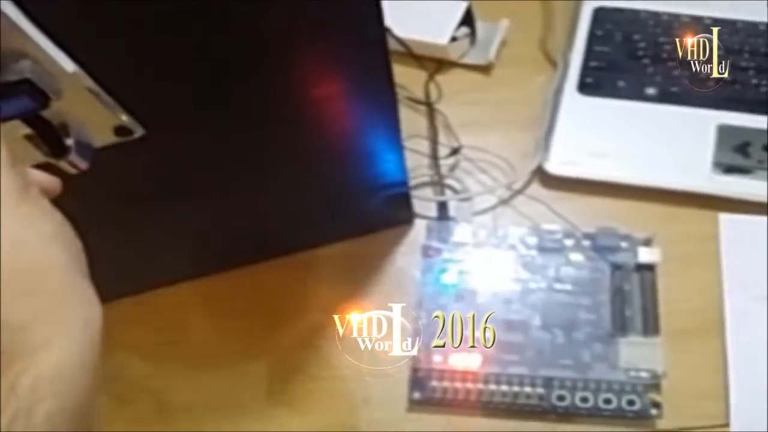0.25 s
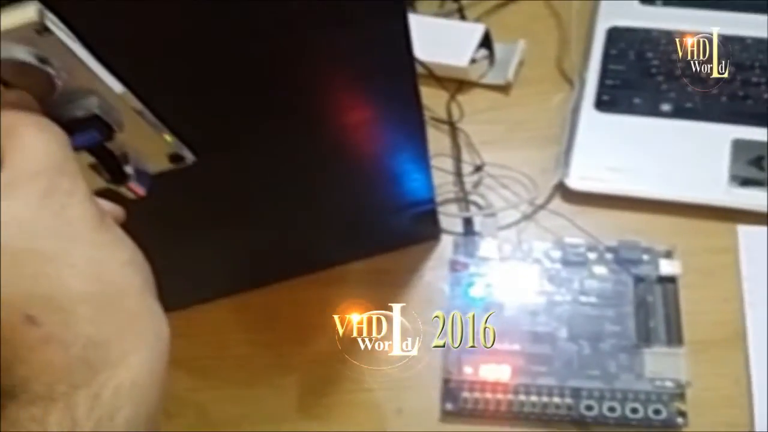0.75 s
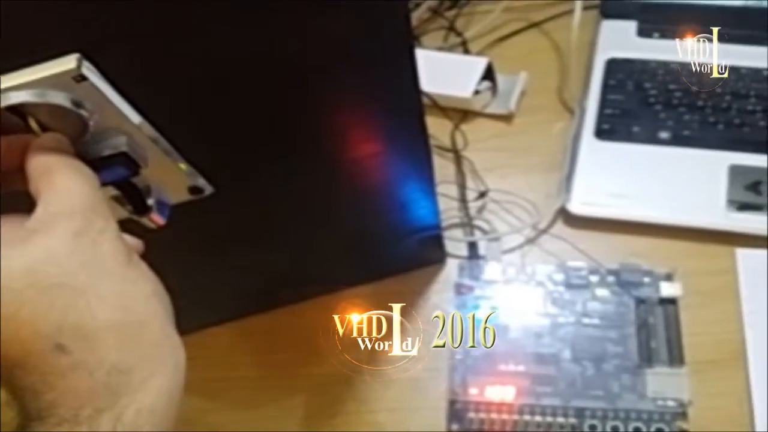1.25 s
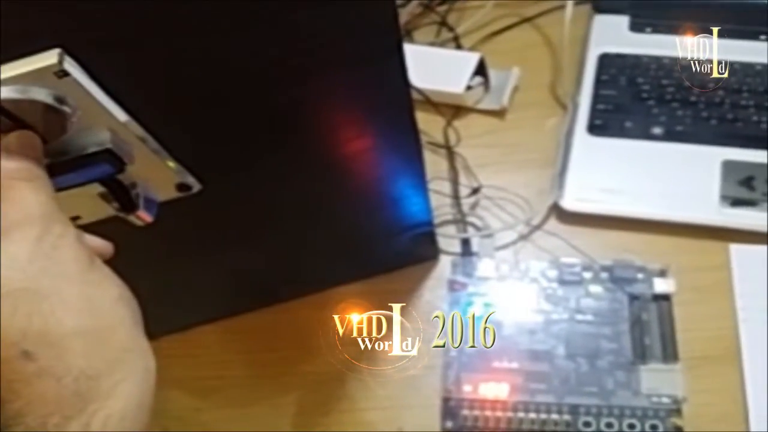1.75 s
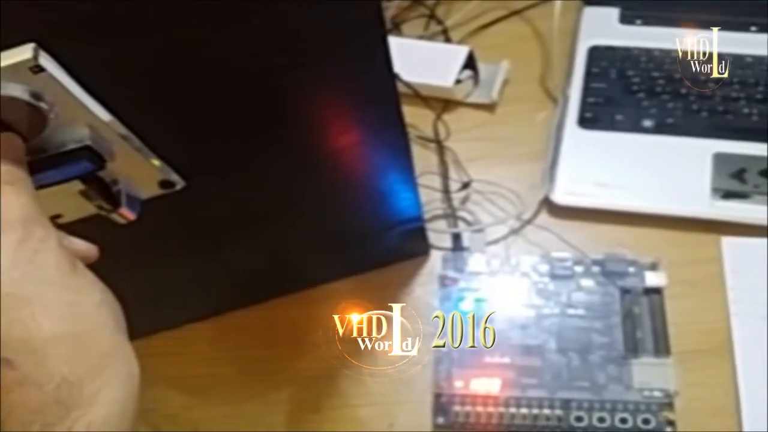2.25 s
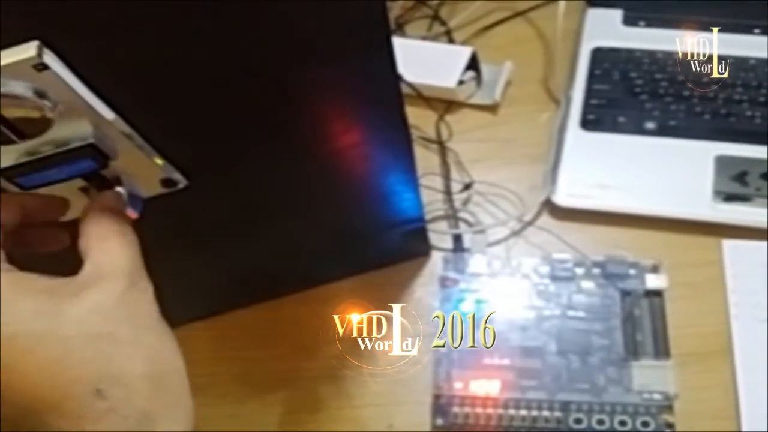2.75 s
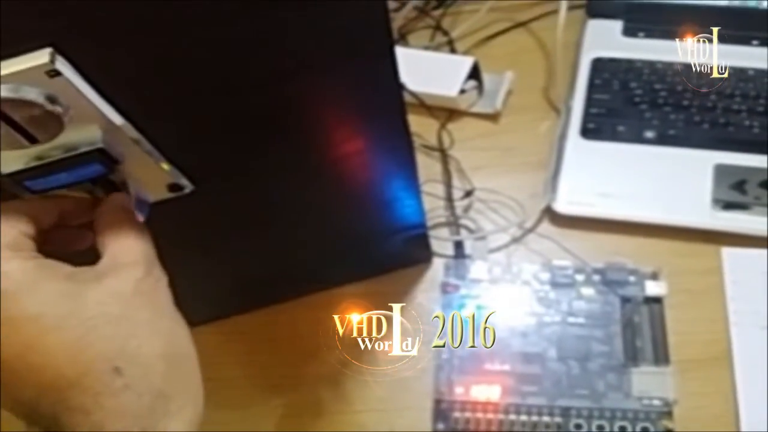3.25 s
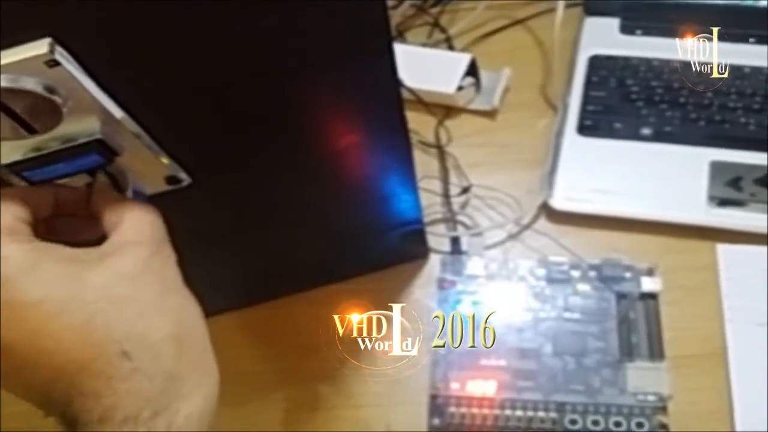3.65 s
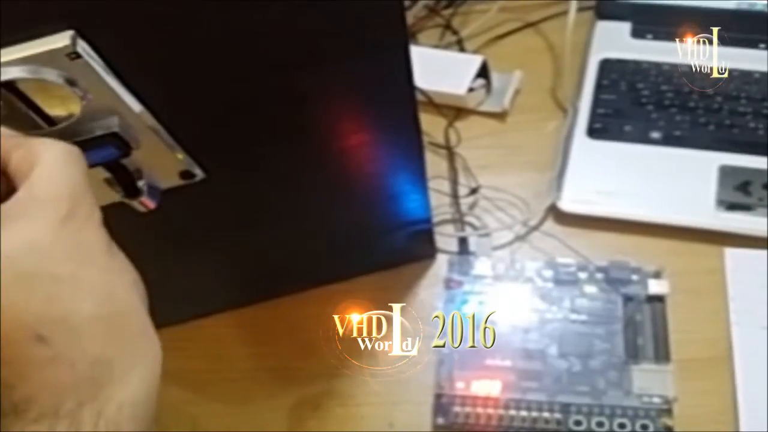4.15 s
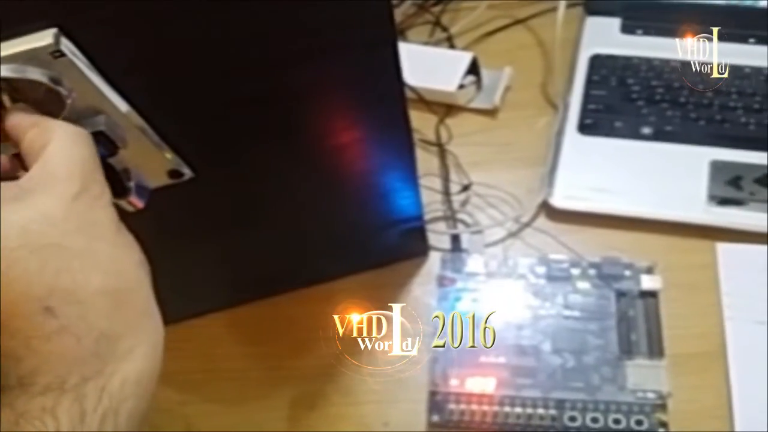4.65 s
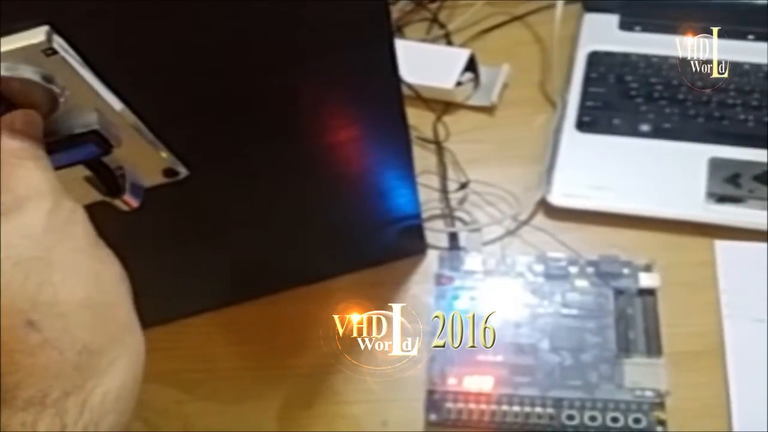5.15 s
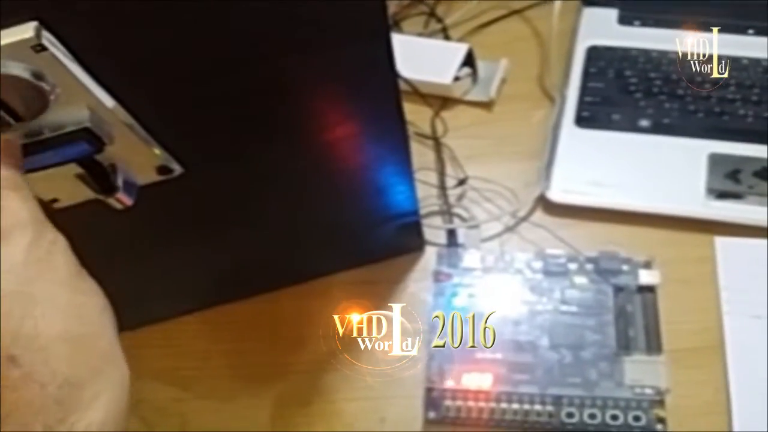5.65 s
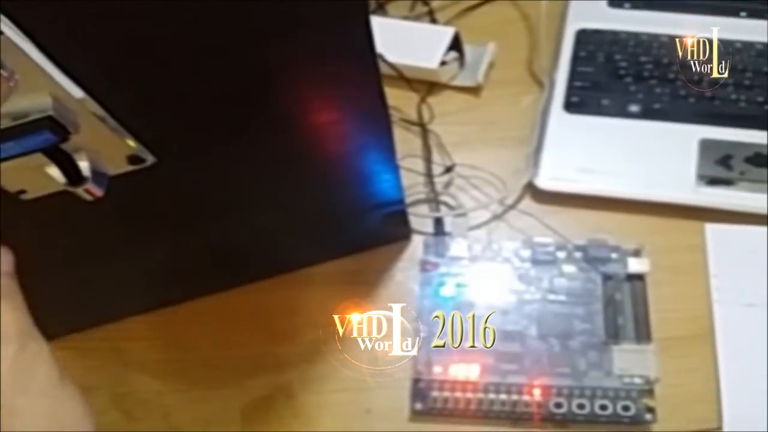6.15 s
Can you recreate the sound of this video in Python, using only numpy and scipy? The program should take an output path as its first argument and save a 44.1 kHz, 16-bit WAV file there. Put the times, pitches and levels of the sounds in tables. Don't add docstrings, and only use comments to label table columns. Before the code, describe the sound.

Close stereo pickup, nearer on the right, of a coin knocking on a face plate, sliding in a slot and rattling inside a hollow case on a desk. Two bursts of clacks are separated by quieter ticks and soft scraping; the second burst is louder and denser. Behind are low traffic rumble, soft hiss, a very faint fan whine and an engine that swells and fades early.

```python
import sys
import numpy as np
from scipy import signal
from scipy.fft import rfft, irfft, next_fast_len
from scipy.io import wavfile
from scipy.ndimage import uniform_filter1d

SR = 44100
rng = np.random.default_rng(int(sys.argv[2]) if len(sys.argv) > 2 else 0)


def dump_mix(stems):
    frames = np.atleast_2d(stems).T
    limited = np.clip(frames, -1, 1)
    pcm = np.round(limited * 32767).astype(np.int16)
    wavfile.write(sys.argv[1], SR, pcm)


def linear_from_db(decibels):
    return 10 ** (np.asarray(decibels, float) / 20)


N = 282194
M = next_fast_len(N)
PLACES = 3
LEFT_LAG_S = .00019


def level(x, db):
    return x * linear_from_db(db) / np.sqrt(np.mean(x ** 2))


def peak(x):
    return x / np.abs(x).max(axis=-1, keepdims=True)


def along(points, hz):
    point_hz, value = np.array(points).T
    return np.interp(np.log(hz + 1), np.log(point_hz + 1), value)


def band(x, low_hz, high_hz):
    edges = [low_hz, min(high_hz, .45 * SR)]
    return signal.sosfilt(signal.butter(2, edges, "band", fs=SR, output="sos"), x)


def walk(rate):
    k = int(SR / rate)
    held = np.repeat(rng.standard_normal(N // k + 1), k)
    return 0.7 * uniform_filter1d(uniform_filter1d(held, k), k)[:N]


def air():
    # frequency in Hz, likeness from 0 to 1.
    likeness = [(60, 1), (130, 0.78), (290, 0.93), (640, 0.34), (1410, 0.32), (3100, 0.25), (6820, 0),
                (15000, 0)]
    # frequency in Hz, density in dB per Hz.
    bass_colour = [(22, -35), (30, -12), (37, 4), (46, -14.5), (62, -8), (85, -10), (114, -9), (160, -14.5),
                   (205, -20), (283, -8), (345, -14), (420, -14), (560, -15.5)]
    hiss_colour = [(250, -15), (420, -3.5), (520, -14.5), (663, -7.5), (705, -9.5), (761, -3), (986, -10.5),
                   (1130, -3.5), (1300, -12), (1650, -4), (2650, -12.5), (4450, -14), (7940, -23.5),
                   (14800, -26), (16000, -32)]
    # time in seconds, level in dB.
    rumble = [(0.0, -53.5), (0.39, -57), (0.94, -51), (1.96, -48.5), (2.64, -49), (2.87, -55), (4.15, -59),
              (4.63, -53.5), (5.11, -54.5), (5.74, -51.5), (5.97, -53.5), (6.4, -59)]
    hz, t = np.fft.rfftfreq(M, 1 / SR), np.arange(N) / SR
    alike = along(likeness, hz)
    mid = rfft(rng.standard_normal(M)) * np.sqrt(1 + alike)
    side = rfft(rng.standard_normal(M)) * np.sqrt(1 - alike)
    both = np.array([mid + side, mid - side])
    low = 1 / (1 + (hz / 480) ** 4)
    rumble_db = np.interp(t, *np.transpose(rumble))
    bass = level(irfft(both * low * linear_from_db(along(bass_colour, hz)), M)[:, :N], -3.7)
    bass = bass * linear_from_db(rumble_db + 0.47 * walk(15))
    hiss = level(irfft(both * (1 - low) * linear_from_db(along(hiss_colour, hz)), M)[:, :N], 0)
    hiss = hiss * linear_from_db(-34.5 + 0.52 * rumble_db + 0.18 * walk(0.96))
    fan_hz = 1158 + 5.34 * walk(4.4)
    fan = linear_from_db(-70 + 3.8 * walk(5.1)) * np.sin(2 * np.pi * np.cumsum(fan_hz) / SR)
    return bass + hiss + fan


def engine():
    # time in seconds, firing rate in Hz, load in dB.
    run = [
        (0.0, 30.47, -88),
        (0.379, 31.62, -68.5),
        (0.86, 32.82, -58.5),
        (1.3, 33.88, -57),
        (1.71, 34.65, -55),
        (1.91, 36.62, -54),
        (2.5, 37.1, -53.5),
        (2.85, 37.46, -59),
        (3.3, 38.5, -94),
    ]
    # multiple of the firing rate, level in dB.
    orders = [(1, -9), (3, 1.5), (4, -11), (5, -15), (7, -11), (8, -5), (9, 5.5)]
    pane_hz, pane_width_hz, pane_leak_db = 295.8, 6.2, -37.5
    s, hz, load_db = np.transpose(run)
    t = np.arange(N) / SR
    rate = np.interp(t, s, hz)
    turn = 2 * np.pi * np.cumsum(rate * (1 + 0.0046 * walk(8.0))) / SR
    fade = np.clip((s[-1] - t) / 0.09, 0, 1)
    load = 2 ** .5 * fade * linear_from_db(np.interp(t, s, load_db))
    order, order_db = np.transpose(orders)[:, :, None]
    resonance = 1 / (1 + ((order * rate - pane_hz) / pane_width_hz) ** 2)
    pane = np.where(order > 7.5, linear_from_db(pane_leak_db) + resonance, 1)
    waver_db = 0.58 * np.array([walk(20) for _ in order])
    return load * np.sum(linear_from_db(order_db + waver_db) * pane * np.sin(order * turn), axis=0)


def room(x):
    # frequency in Hz, time to fall 60 dB in seconds.
    decay = [(150, 0.25), (700, 0.34), (2500, 0.26), (6000, 0.22), (14000, 0.2)]
    room_db, early_db, early_s, patchy_db = -2.5, 2, 0.0079, 3.5
    t, tail = np.arange(SR // 2) / SR, 0
    for hz in 90 * 2. ** np.arange(8):
        noise = rng.standard_normal((2, PLACES, 1, len(t)))
        mid, side = band(noise, hz / 2 ** .5, hz * 2 ** .5)
        spread = np.minimum(hz / 800.0 + t / 0.11, min(hz / 2100.0, 1))
        both = mid + spread * side * np.array([[1], [-1]])
        clumps = linear_from_db(patchy_db * walk(150)[:PLACES * len(t)].reshape(PLACES, 1, -1))
        tail = tail + clumps * both * 1000 ** (-t / along(decay, hz))
    tail = tail * np.clip(t / 0.00026, 0, 1) * (1 + linear_from_db(early_db) * np.exp(-t / early_s))
    tail[:, 0] = np.roll(tail[:, 0], round(LEFT_LAG_S * SR), axis=-1)
    tail = tail * linear_from_db(room_db) / np.sqrt(np.sum(tail ** 2) / 2 / PLACES)
    heard = np.sum(rfft(x, M + SR)[:, None] * rfft(tail, M + SR), axis=0)
    return irfft(heard, M + SR)[:, :N]


def ring(modes, broad_db, low_hz, high_hz, count):
    t = np.arange(SR // 5) / SR
    detune = .006 * rng.standard_normal((len(modes), count, 1))
    uneven_db = 4.5 * rng.standard_normal((len(modes), count, 1))
    y = 0
    for (hz, db, t60), d, u in zip(modes, detune, uneven_db):
        y = y + linear_from_db(db + u) * np.sin(2 * np.pi * hz * (1 + d) * t) * 1000 ** (-t / t60)
    click = band(band(1. * (t == 0), low_hz, high_hz), low_hz, high_hz)
    return peak(peak(y) + linear_from_db(broad_db) * peak(click))


def case(count, sharp_db):
    # frequency in Hz, level in dB, time to fall 60 dB in seconds.
    desk = [(120.8, -1.5, 0.29), (160.7, -2, 0.42), (283, -21, 0.21), (284.6, 10, 0.12),
            (450, -23.5, 0.0057)]
    shell = [(736, -11, 0.072), (818, 13.5, 0.019), (1023, 4, 0.034), (1298, 1, 0.057), (1406, 0, 0.1)]
    face_plate = [(2000, -1, .03), (2230, 1, .035), (2580, 1, .03), (3080, 5, .03), (3380, -1, .03),
                  (3720, -4, .04), (4150, -8, .02), (4800, -12, .015)]
    rim = [(4650, 3, .016), (5200, 5, .016), (5750, 1, .012), (6760, -10, .006), (8060, -6, .0067),
           (12100, -6, .0036)]
    return [ring(desk, sharp_db - 13, 130, 520, count),
            ring(shell, sharp_db - 9, 440, 1900, count),
            ring(face_plate, sharp_db, 1500, 4200, count),
            ring(rim, sharp_db + 1, 4100, 13500, count)]


def sliding():
    # start in seconds, hold in seconds, clack in dB, heft into the case in dB, bite of the rim in dB.
    slides = [(1.654, 0.19, -50.5, 8.5, -16), (1.91, 0.04, -57, 13, 9), (2.043, 0.016, -33.5, 0, -22),
              (2.103, 0.085, -45, 5.5, -26), (2.258, 0.055, -62.5, 23.5, 5), (3.74, 0.019, -50, -2, -46),
              (3.801, 0.0046, -39, 0, -42), (4.464, 0.12, -50.5, -7.5, -13), (4.71, 0.2, -58, 2.5, -8),
              (5.125, 0.18, -50, 7, -13), (5.351, 0.093, -35.5, -3, -12.5), (5.417, 0.024, -56, 11, -4),
              (5.59, 0.012, -29, -13, -34.5), (5.746, 0.029, -39.5, 4.5, -3.5),
              (5.792, 0.06, -30, -1, -12.5), (5.902, 0.2, -53.5, 7.5, -3)]
    grains_per_s, spread_db = 3000, 2.2
    catch_db_s, let_go_db_s = 406, 450
    t, out = np.arange(N) / SR, 0
    grip = linear_from_db(0.32 * walk(41))
    s, hold, db, heft_db, bite_db = np.transpose(slides)[:, :, None]
    building, dying = np.maximum(s - t, 0), np.maximum(t - s - hold, 0)
    strokes = linear_from_db(db - catch_db_s * building - let_go_db_s * dying)
    part_db = (heft_db + 0.5, heft_db, 0 * db, bite_db)
    for body, rel_db in zip(case(PLACES, sharp_db=-3), part_db):
        clicks = rng.random((PLACES, N)) < grains_per_s / SR
        clicks = clicks * linear_from_db(spread_db * rng.exponential(size=(PLACES, N)))
        clicks = clicks * np.sign(rng.random((PLACES, N)) - .5)
        force = linear_from_db(rel_db)[:, 0] @ strokes
        rub = signal.fftconvolve(clicks, body, axes=1)[:, :N]
        out = out + force * grip * level(rub, -12.5)
    return out


def singing():
    # start in seconds, time shaken in seconds,
    # pitch in Hz, level in dB.
    sung_modes = [(1.588, 0.01, 2300, -44), (1.632, 0.018, 779, -29), (1.633, 0.029, 1360, -33.5),
                  (1.66, 0.19, 753, -48), (1.683, 0.045, 2240, -43), (1.77, 0.032, 2170, -36),
                  (1.879, 0.016, 315, -21.5), (1.88, 0.017, 786, -30.5), (1.962, 0.032, 1360, -34),
                  (1.941, 0.071, 162, -39.5), (2.018, 0.029, 3350, -39), (2.105, 0.061, 820, -30.5),
                  (2.095, 0.081, 2150, -27.5), (2.232, 0.0053, 3080, -43), (2.233, 0.0033, 3480, -12),
                  (2.335, 0.0061, 995, -34.5), (2.62, 0.011, 813, -45.5), (5.416, 0.0095, 4600, -45),
                  (3.755, 0.033, 2550, -41), (3.784, 0.039, 3110, -37.5), (3.801, 0.014, 2170, -29.5),
                  (4.233, 0.0057, 850, -41), (4.47, 0.13, 1406, -52), (4.738, 0.015, 1430, -47.5),
                  (4.735, 0.014, 2260, -44), (5.1, 0.045, 815, -37), (5.105, 0.03, 1370, -41),
                  (5.11, 0.02, 2220, -35), (5.2, 0.066, 760, -49), (5.2, 0.11, 2170, -44.5),
                  (5.373, 0.0061, 3400, -35.5), (5.374, 0.0074, 1052, -28.5), (5.414, 0.015, 2690, -22.5),
                  (5.44, 0.011, 813, -38), (5.529, 0.011, 772, -16.5), (5.539, 0.023, 1326, -16.5),
                  (5.545, 0.013, 1425, -19), (5.531, 0.015, 4170, -20.5), (5.56, 0.06, 2410, -27.5),
                  (5.582, 0.0073, 1700, -15), (5.589, 0.0312, 1326, -22), (5.62, 0.028, 1480, -46),
                  (5.73, 0.04, 553, -25.5), (5.738, .006, 3680, -17), (5.81, 0.018, 3620, -27),
                  (5.251, 0.039, 302, -40), (5.849, 0.081, 151, -39), (6.034, 0.016, 774, -32.5),
                  (5.529, 0.15, 116, -33.5), (4.233, 0.0086, 4750, -34),
                  (1.877, 0.01, 5800, -32), (1.878, 0.016, 4500, -32.5), (1.934, 0.0053, 5900, -46),
                  (1.936, 0.018, 4330, -40), (2.24, 0.043, 4800, -39), (2.245, 0.052, 2100, -49),
                  (5.375, .012, 5600, -36), (5.429, .012, 3330, -37), (5.728, 0.027, 5100, -30.5),
                  (5.745, 0.014, 3730, -31), (5.782, 0.056, 5200, -41), (5.79, 0.024, 3940, -26.5),
                  (5.826, 0.04, 3740, -42), (4.78, 0.048, 2260, -51.5), (5.0, 0.074, 700, -53),
                  (5.918, 0.052, 765, -44)]
    t60_s, shortens = .034, 0.86
    out, t = np.zeros(N + SR), np.arange(SR // 2) / SR
    for s, hold, hz, db in sung_modes:
        onset = np.clip(t / .012, 0, 1) if hold > .04 else 1 + 2 * np.exp(-t / .002)
        jolts = rng.standard_normal(len(t)) ** 3 * np.clip((hold - t) / .002, 0, 1) * onset
        mode = np.sin(2 * np.pi * hz * t) * 1000 ** (-t / (t60_s * (hz / 1000) ** -shortens))
        y = signal.fftconvolve(jolts, mode)[:len(t)]
        shaken = y[:int((hold + .005) * SR)]
        start = int(s * SR)
        out[start:start + len(t)] += linear_from_db(db) * y / np.sqrt(np.mean(shaken ** 2))
    return out[:N]


def blows():
    # time in seconds, peak of the clack in dB, heft into the case in dB,
    # bite of the rim in dB, pitch of the clack in Hz.
    on_case = [(1.6332, -22, -10.5, -12.5, 2195), (1.6994, -36, -18, -25, 2230),
               (1.8158, -42.5, 15, -13, 1890), (1.9365, -17.5, -3, 0, 3280), (2.1774, -34, -14, -22, 2180),
               (2.3336, -17, -17.5, -32.5, 3115), (3.1892, -51, -6, -21.5, 3300),
               (3.8144, -40, 13, -19, 2280), (4.4643, -35.5, -10, -18, 2050), (4.5635, -47, -2, -14, 3620),
               (4.6244, -47, -1.5, -14, 3400), (4.7341, -56, -2, -25, 2220), (4.8344, -51, 9, -38, 2320),
               (5.008, -44.5, 6.5, -32, 2200), (5.022, -41.5, 8, -29, 2260),
               (5.1023, -35.5, 8.5, -10.5, 2240), (5.3193, -28.5, -9, -8.5, 3120),
               (5.4146, -18, -10, 2.5, 2760), (5.5298, -8, 4, -11, 2930), (5.5395, -20.5, 6, 1, 2770),
               (5.549, -15.5, 0.5, -12, 2700), (5.5852, -21, 9, -20, 2740), (5.9075, -30.5, 3, -18, 2600)]
    through_desk = [(1.5885, -50, 6, -24, 2270), (1.7689, -37, 6.5, -28, 2297), (2.0223, -34, 2, -32, 3480),
                    (2.0527, -18, -5, -19, 2580), (2.0866, -17, -7.5, -40, 2980),
                    (2.1094, -21, -36, -35, 3020), (2.2318, -12.5, -35, -0.5, 3310),
                    (2.2346, -6.5, -24, -12, 3000), (2.3141, -24.5, -11, -1, 4080),
                    (2.6209, -46.5, 8, -12, 2880), (3.293, -26.5, -18.5, -16, 3200),
                    (3.2998, -26, -11.5, -12, 2960), (3.3034, -31.5, -8, -22, 2270),
                    (3.3508, -50, -12, -2, 4500), (3.354, -41.5, 0, -14, 2200),
                    (3.3965, -48, -14, -6, 4070), (3.3995, -40, -5, -5, 3420),
                    (3.4035, -37.5, -5, -9, 2600), (3.5872, -47.5, 3, -23, 2260),
                    (4.2328, -27, -7.5, -2.5, 3380), (5.2111, -43.5, 9.5, -28, 2220),
                    (5.3547, -18, -11, -8.5, 2670), (5.7374, -21, -1, 9.5, 3580),
                    (5.7885, -20.5, -15, 3, 4040), (5.8424, -16, -12, -19, 2560),
                    (5.9424, -29, -28, -33, 3180), (6.0287, -11.5, -13.5, 5, 3230)]
    rattles = [
        (1.8751, -21.5, -26, 5, 4800),
        (1.8771, -14.5, 0, -1, 3394),
        (5.122, -34.5, -22, -37, 3260),
        (5.3732, -13.5, -9.5, -6, 2965),
        (5.7249, -19, -4, 6.5, 4170),
        (5.7803, -17.5, -0.5, -2.5, 4160),
        (5.8132, -20.5, 1, 3.5, 3700),
        (6.0077, -33, -26, -8, 2620),
    ]
    # desk thump in dB over the heft, contact in ms
    kinds = (on_case, (-8.5, 1.02)), (through_desk, (0.25, 0.59)), (rattles, (0.4, 5.3))
    hits = [row + shared for rows, shared in kinds for row in rows]
    out, t = np.zeros((1 + PLACES, N + SR)), np.arange(SR // 5) / SR
    s, db, heft_db, bite_db, hz, desk_db, contact_ms = np.transpose(hits)[:, :, None]
    starts = (s[:, 0] * SR).astype(int)
    own = np.sin(2 * np.pi * hz * t) * np.exp(-t / .003)
    parts = case(len(hits), sharp_db=14.5 + 0.15 * bite_db)
    part_db = (heft_db + desk_db, heft_db, 3, bite_db - 2)
    for body, rel_db, lean in zip(parts, part_db, (0.63, 0.0435, 0.94, 0.052)):
        contact = np.exp(-1000 * t[:SR // 20] / contact_ms)
        chatter = rng.standard_normal((len(hits), SR // 20)) ** 3 * contact
        direct = linear_from_db(db + rel_db) * peak(signal.fftconvolve(chatter, body + lean * own, axes=1))
        energy = np.linalg.norm(direct, axis=1, keepdims=True) / np.linalg.norm(body, axis=1, keepdims=True)
        around = (body + .25 * lean * own) * energy
        for k, (start, near, far) in enumerate(zip(starts, direct, around)):
            out[0, start:start + len(near)] += near
            out[1 + k % PLACES, start:start + len(far)] += far
    return out[:, :N]


def scene():
    background = engine() + air()
    rubbing = sliding()
    struck = blows() + np.vstack([rubbing.sum(axis=0), rubbing])
    struck[:2] += singing() * linear_from_db([[-5.5], [-8]])
    coin, *around = band(struck, 130, 21000)
    delay = np.exp(-2j * np.pi * np.fft.rfftfreq(M, 1 / SR) * LEFT_LAG_S)
    late = irfft(rfft(coin, M) * delay, M)[:N]
    return linear_from_db(-1.5) * np.array([late, coin]) + room(np.array(around)) + background


def band_limit(x):
    return signal.sosfilt(signal.butter(12, 16610, fs=SR, output="sos"), x)


def record(dry):
    # frequency in Hz, difference in dB.
    port_tilt = [(60, 0.5), (200, 0.5), (700, 3.5), (1290, 2.0), (1700, 4), (2500, 1), (3900, -10.0),
                 (5500, -13), (8120, -5.0), (10000, -2), (15000, -7)]
    tilt_db = along(port_tilt, np.fft.rfftfreq(M, 1 / SR)) / 2
    colour = linear_from_db(np.array([tilt_db, -tilt_db]))
    ports = irfft(rfft(dry, M, axis=1) * colour, M, axis=1)[:, :N]
    rounded = .93 * np.tanh(ports / .93)
    top_cut = signal.ellip(6, .2, 35, 15800, fs=SR, output="sos")
    return band_limit(signal.sosfilt(top_cut, rounded))


dry = scene()
out = record(dry)
dump_mix(out)
```